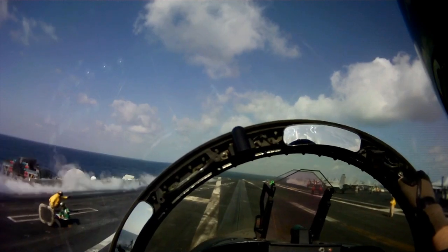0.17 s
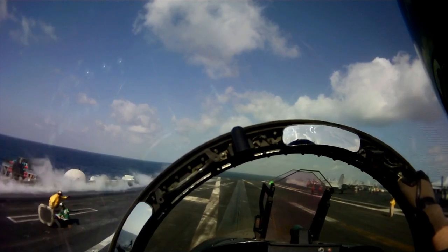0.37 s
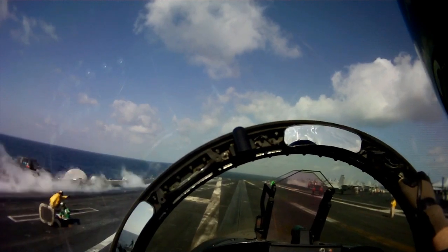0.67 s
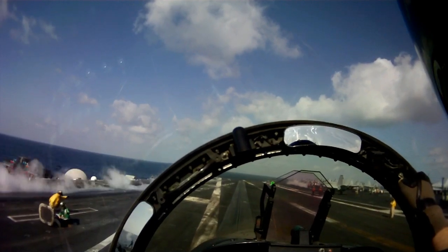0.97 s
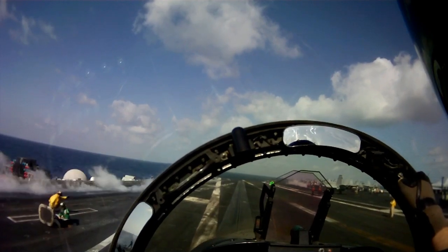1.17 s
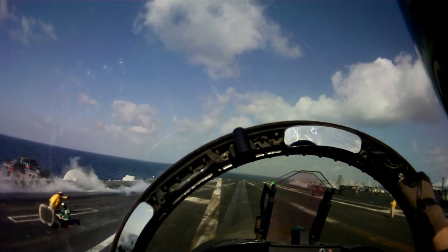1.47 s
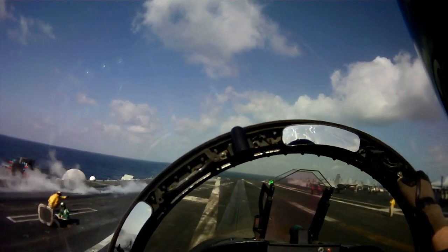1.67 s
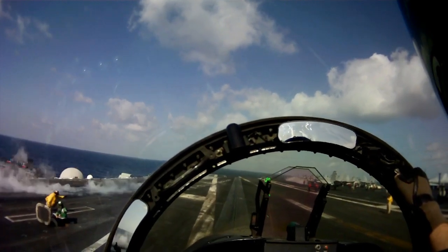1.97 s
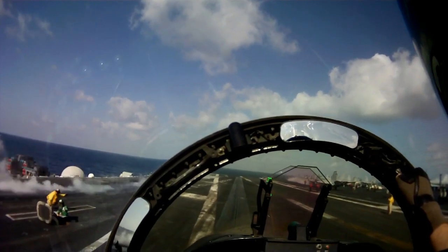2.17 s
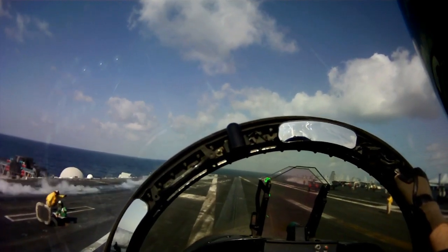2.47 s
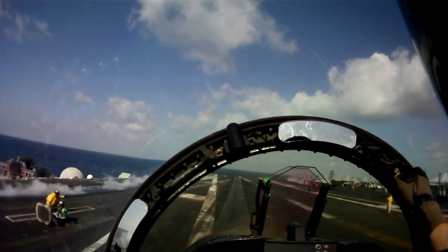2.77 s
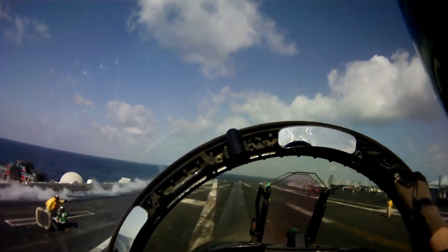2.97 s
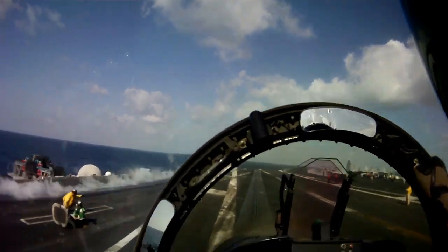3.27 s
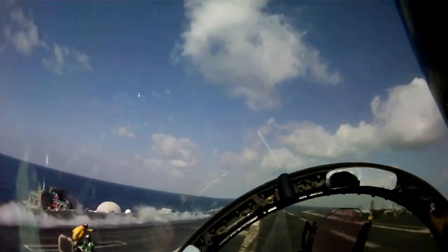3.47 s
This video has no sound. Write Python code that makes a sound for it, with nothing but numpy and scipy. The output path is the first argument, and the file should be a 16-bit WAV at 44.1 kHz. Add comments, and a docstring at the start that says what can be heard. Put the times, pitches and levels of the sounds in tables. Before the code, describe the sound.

A jet engine at full power roars inside a cockpit on a carrier deck, with a shrill steady whine and fluttering air rush; late on, a sharp crack, a sudden dip, then it builds again with rumble.

```python
"""Catapult launch from the cockpit

A jet at full power on a carrier catapult: its exhaust is broadband noise filtered by cabin resonances.
The compressor whine is a wandering harmonic series over a fluttering rush of coloured noise.
The launch jolt, three pressure spikes, chokes the microphone for an instant.
The level dips and builds again while low-frequency noise makes the airframe rumble."""
import sys
import numpy as np
from scipy import signal
from scipy.fft import rfft, irfft
from scipy.io import wavfile
from scipy.ndimage import uniform_filter1d

SR = 44100
rng = np.random.default_rng(int(sys.argv[2]) if len(sys.argv) > 2 else 0)


def transcribe(signal):
    """Save signal, clipped to [-1, 1], as a 16-bit WAV file at the path in sys.argv[1]."""
    frames = np.atleast_2d(signal).T
    limited = np.clip(frames, -1, 1)
    pcm = np.round(limited * 32767).astype(np.int16)
    wavfile.write(sys.argv[1], SR, pcm)


N = 159642  # samples
T = np.arange(N) / SR  # s
HZ = np.fft.rfftfreq(N, 1 / SR)


def amp(db):
    """Decibel law: converts level to amplitude gain."""
    return 10 ** (np.asarray(db) / 20)


def unit(x):
    """Normalisation: scales a signal to rms 1."""
    return x / np.sqrt(np.mean(x ** 2) + 1e-20)


def curve(rows, axis=1):
    """Amplitude envelope: gain over time, interpolated from one dB column of a table."""
    rows = np.array(rows)
    return amp(np.interp(T, rows[:, 0], rows[:, axis]))


def noise(gain):
    """Random-phase synthesis: noise of rms 1 whose spectrum follows the given gain."""
    phase = 2 * np.pi * rng.random(len(HZ))
    return unit(irfft(gain * np.exp(1j * phase), N))


def colour(points):
    """Spectral envelope: gain at each frequency, in dB over log frequency."""
    hz, db = np.transpose(points)
    return amp(np.interp(np.log(HZ + 1), np.log(hz), db))


def drift(rate_hz):
    """Low-pass random modulation: wavering of rms 1, mostly slower than the rate."""
    slow_cut = HZ / (HZ + 2)
    fast_cut = 1 / np.sqrt(1 + (HZ / rate_hz) ** 2) / (1 + (HZ / rate_hz / 10) ** 2)
    return noise(slow_cut * fast_cut)


def above(x, hz):
    """High-pass filtering: the part of a sound above a frequency."""
    return irfft(rfft(x) * (1 - np.exp(-(HZ / hz) ** 6)), N)


def resonances(rows):
    """Resonance: turbulence concentrated in narrow bands about each centre frequency."""
    bands = []
    for hz, width, db in rows:
        bands.append(amp(db) * noise(1 / (1 + ((HZ - hz) / width) ** 2)))
    return sum(bands)


# exhaust spectrum in the cabin: f/Hz, relative level/dB per Hz
ROAR_SPECTRUM = [(25, -46), (50, -31), (72, -26.5), (97, -13.5), (130, -15.5), (165, -9), (210, -9.5),
                 (290, -6), (420, -0.5), (530, 0), (580, -2.5), (700, -3.5), (860, -9.5), (1000, -16.5),
                 (1500, -26.5), (2500, -39)]
# cabin resonances: f/Hz, half-width at half amplitude/Hz, rms level/dB before steadying
CABIN_MODES = [(100.8, 10.3, -43.5), (244.7, 9.1, -36), (335, 19, -30.5), (400, 18, -31), (491, 15, -30),
               (538.3, 16, -30.5)]
# relative levels through the launch: t/s, roar level/dB, rush level/dB, whine level/dB
LAUNCH_LEVELS = [(2.6, 2, -0.5, 0), (2.87, 2.7, 1, 2.5), (2.92, -1, -3.5, 0.5), (3.03, 2, -1, -1.5),
                 (3.15, 1, 0, 3.2), (3.175, -9.5, -9, -23), (3.22, -9, -7.5, -14),
                 (3.255, -3.5, -6.5, -5.5), (3.35, -1, -4.5, -13), (3.45, 1.5, -1, 1.5),
                 (3.51, 0.5, -3.5, -8), (3.6, 0, 2, 0)]
ROAR_DB = -20.5  # rms, before steadying, crackle and launch level
STEADY_SHARE, STEADY_S = 0.37, 0.026  # share of level variation removed, smoothing time
CREST_GAIN, CRACKLE_HZ, CRACKLE_TOP_HZ = 0.17, 1040, 2340  # crackle amount and band


def exhaust():
    """Filtered turbulence: even cabin-coloured roar, with cubic distortion crackling on its crests."""
    roar = amp(ROAR_DB) * noise(colour(ROAR_SPECTRUM)) + resonances(CABIN_MODES)
    # Dividing by a power of the short-term power evens out the level
    power = irfft(rfft(unit(roar) ** 2) * np.exp(-(HZ * STEADY_S) ** 2), N)
    roar = roar / (abs(power) + 1e-6) ** (STEADY_SHARE / 2)
    crests = roar * unit(roar) ** 2
    treble_cut = 1 / (1 + (HZ / CRACKLE_TOP_HZ) ** 4)
    crackle = irfft(rfft(above(crests, CRACKLE_HZ)) * treble_cut, N)
    return (roar + CREST_GAIN * crackle) * curve(LAUNCH_LEVELS, axis=1)


FLUTTER_DB, FLUTTER_HZ = 1.09, 39  # rms depth, rate
SAGS_PER_S, SAG_DB, SAG_RETURN_S = 20, 3, 0.01  # mean rate, depth before smoothing, decay time


def flutter():
    """Random amplitude modulation: treble gain flickers and sags, dropping fast and returning slower."""
    starts = 1. * (rng.random(N) < SAGS_PER_S / SR)
    sags = signal.lfilter([1], [1, -np.exp(-1 / (SAG_RETURN_S * SR))], starts)
    sags = uniform_filter1d(sags - sags.mean(), size=60)
    return amp(FLUTTER_DB * drift(FLUTTER_HZ) - SAG_DB * sags)


# harmonics of the whine: multiple of the fundamental, rms level/dB before modulation
WHINE_HARMONICS = [(1, -26.5), (2, -40.5), (3, -55), (4, -66)]
# spectrum of the air rush: f/Hz, relative level/dB per Hz
RUSH_SPECTRUM = [(500, -17.5), (1200, -8.5), (1600, -13.5), (2100, -7), (2600, -2), (2830, -5),
                 (2950, -2.5), (3170, -2), (3480, 3.1), (3850, -2), (4150, -2.5), (4400, -0.5),
                 (4650, -12.5), (4900, -8.5), (5800, -14.5), (6900, -9), (7250, -14), (9000, -19),
                 (11000, -23), (12800, -30), (15000, -67)]
# fainter turbine tones: f/Hz, half-width at half amplitude/Hz, rms level/dB before modulation
TURBINE_TONES = [(2999, 24, -37.5), (3520, 8, -68), (4403, 38, -44), (6980, 12, -49), (7430, 18, -55),
                 (8700, 12, -57), (9172, 15, -70)]
# uneven treble level before the launch, chance ups and downs: t/s, relative level/dB
TREBLE_UNEVENNESS = [(0, 1), (.15, -1.5), (.28, 0), (.42, -1), (.53, 0.5), (.83, -1.3), (.94, 0),
                     (1.02, -2), (1.1, 1.8), (1.24, 0), (1.9, -0.43), (2.04, 2.5), (2.24, 0.3),
                     (2.34, -0.1), (2.45, -0.5), (2.56, 0), (2.77, -1.5), (2.86, -0.5)]
WHINE_HZ, WANDER_HZ, SHIMMER_DB = 3519.8, 1, 0.15  # mean frequency, rms wander, rms shimmer
RUSH_DB = -22  # rms, before modulation


def compressor():
    """Harmonic series: a wandering blade whine, fainter tones and rushing air share one modulation."""
    turns = np.cumsum(WHINE_HZ + WANDER_HZ * drift(rate_hz=9)) / SR
    harmonics = []
    for multiple, db in WHINE_HARMONICS:
        shimmer = SHIMMER_DB * drift(rate_hz=3.3)
        tone = unit(np.sin(2 * np.pi * round(multiple) * turns))
        harmonics.append(amp(db + shimmer) * tone)
    whine = sum(harmonics) * curve(LAUNCH_LEVELS, axis=3)
    air = amp(RUSH_DB) * noise(colour(RUSH_SPECTRUM)) + resonances(TURBINE_TONES)
    air = air * curve(LAUNCH_LEVELS, axis=2)
    unevenness = np.where(T < TREBLE_UNEVENNESS[-1][0], curve(TREBLE_UNEVENNESS), 1)
    return (air + whine) * unevenness * flutter()


# treble level above the edge, dulled just after the jolt: t/s, relative level/dB
DULLING = [(3.15, 3), (3.18, -2), (3.225, -8), (3.25, 3)]
DULL_HZ = 4600


def dulled(treble):
    """Time-varying shelf filter: the top of the treble is raised, then briefly dulled after the jolt."""
    return treble + (curve(DULLING) - 1) * above(treble, DULL_HZ)


# airframe shudder: t/s, deep rumble rms level/dB, higher boom rms level/dB
SHUDDER_LEVELS = [(2.84, -52, -58), (2.92, -30, -48), (3.01, -39, -36), (3.12, -40, -33), (3.175, -34, -33),
                  (3.25, -32, -31), (3.36, -45, -26.5), (3.43, -36, -32), (3.5, -40, -40.5),
                  (3.62, -37, -27)]
# rumble spectrum: f/Hz, relative level/dB per Hz
RUMBLE_SPECTRUM = [(20, -25), (50, -9), (90, 10), (135, 1), (250, -27.5)]
# boom spectrum: f/Hz, relative level/dB per Hz
BOOM_SPECTRUM = [(80, -21), (150, -1.5), (250, -4), (330, -9), (700, -37)]


def airframe():
    """Random structural vibration: as the catapult takes hold, a deep rumble, then a higher boom."""
    rumble = curve(SHUDDER_LEVELS, axis=1) * noise(colour(RUMBLE_SPECTRUM))
    boom = curve(SHUDDER_LEVELS, axis=2) * noise(colour(BOOM_SPECTRUM))
    return rumble + boom


# cracks of the launch jolt: t/s, signed peak amplitude, rise time constant/s, decay time constant/s
JOLT_CRACKS = [(3.1578, .65, .00025, .00015), (3.1624, -.92, .00002, .00028), (3.1679, .33, .0004, .0003)]


def jolt():
    """Impulsive excitation: two-sided exponential pressure spikes as the aircraft is let go."""
    cracks = []
    for start, peak, rise, decay in JOLT_CRACKS:
        cracks.append(peak * np.exp(-np.maximum((start - T) / rise, (T - start) / decay)))
    return sum(cracks)


CHOKE_START_S, CHOKE_END_S, CHOKE_DB = 3.158, 3.17, -19


def choke():
    """Transient attenuation: gain of the microphone, choked for an instant by the jolt."""
    choked = 1. * ((T > CHOKE_START_S) & (T < CHOKE_END_S))
    return amp(CHOKE_DB * uniform_filter1d(choked, size=40))


def scene():
    """Superposition: engine and airframe, choked for an instant, plus the unattenuated jolt."""
    cockpit = exhaust() + dulled(compressor()) + airframe()
    return (cockpit * choke() + jolt())[None]


EDGE_HZ = 15000


def record(dry):
    """Band limitation: a linear-phase low-pass sets the recorder's upper edge."""
    low_pass = signal.firwin(511, EDGE_HZ, window=("kaiser", 9), fs=SR)
    return signal.oaconvolve(dry, low_pass[None], "same")


dry = scene()
out = record(dry)
transcribe(out)
```